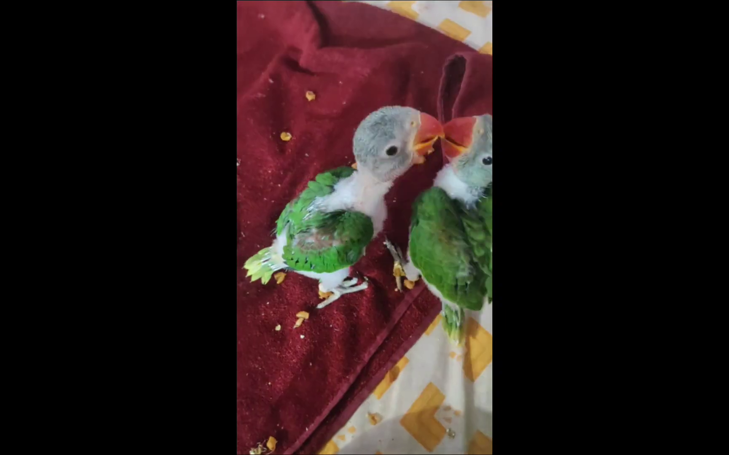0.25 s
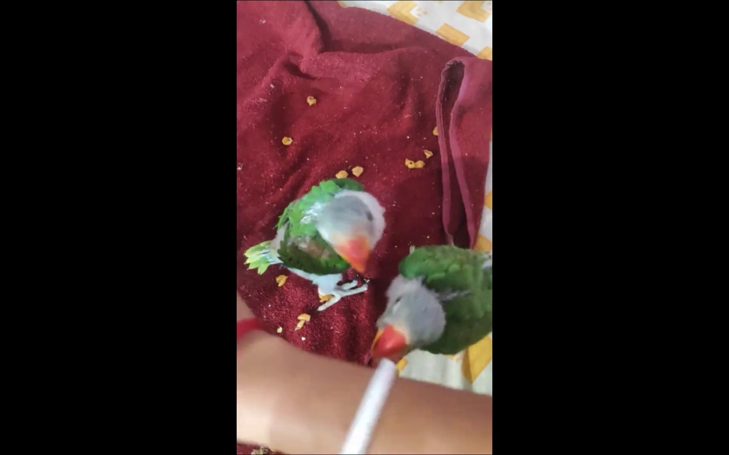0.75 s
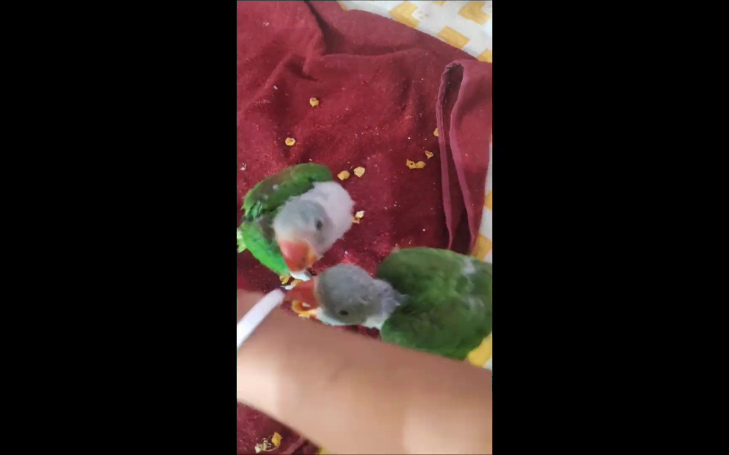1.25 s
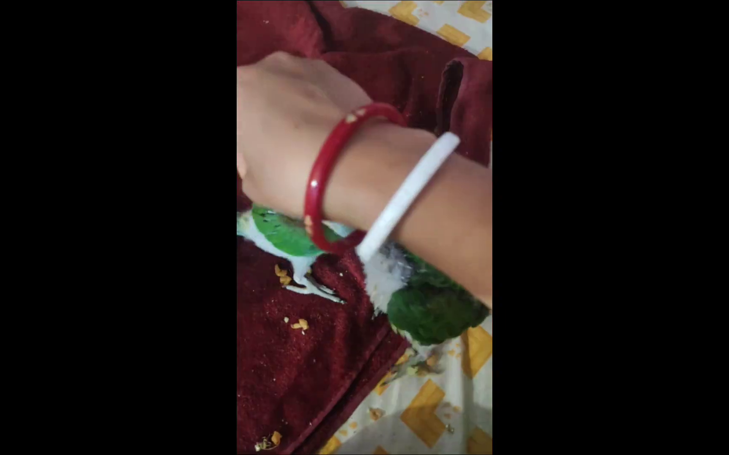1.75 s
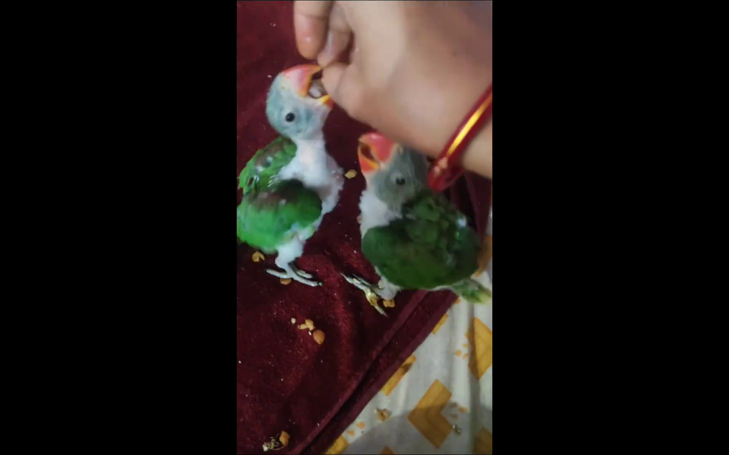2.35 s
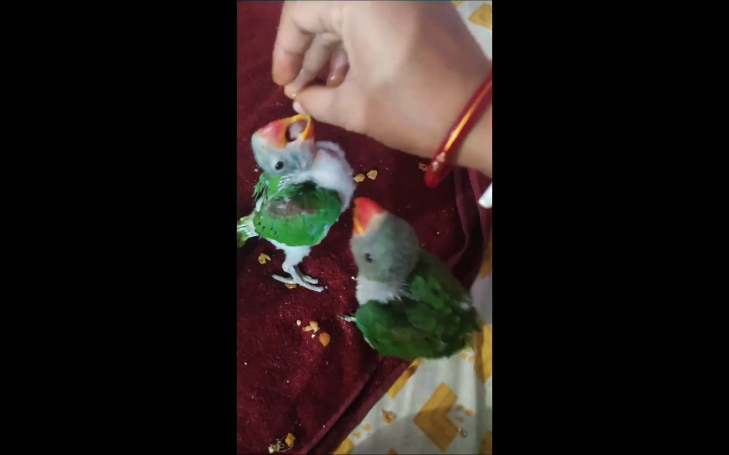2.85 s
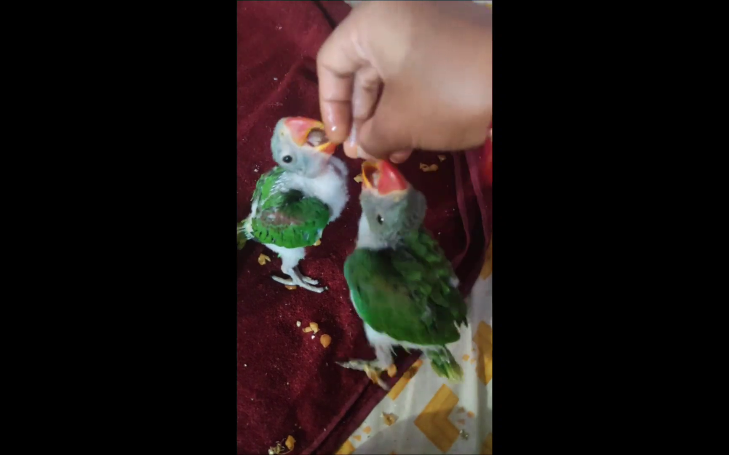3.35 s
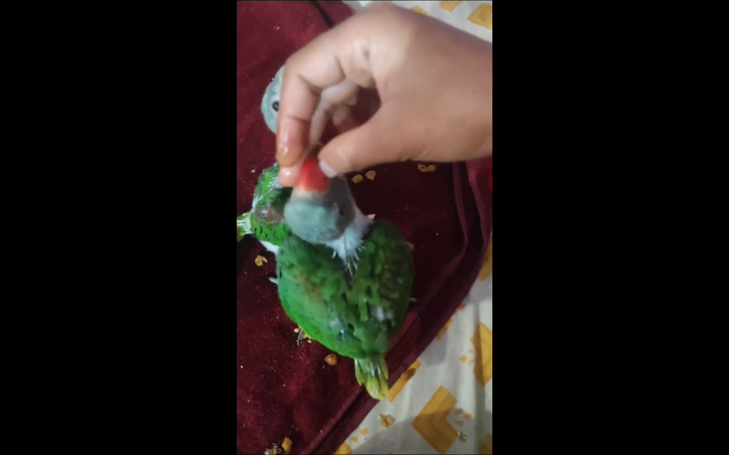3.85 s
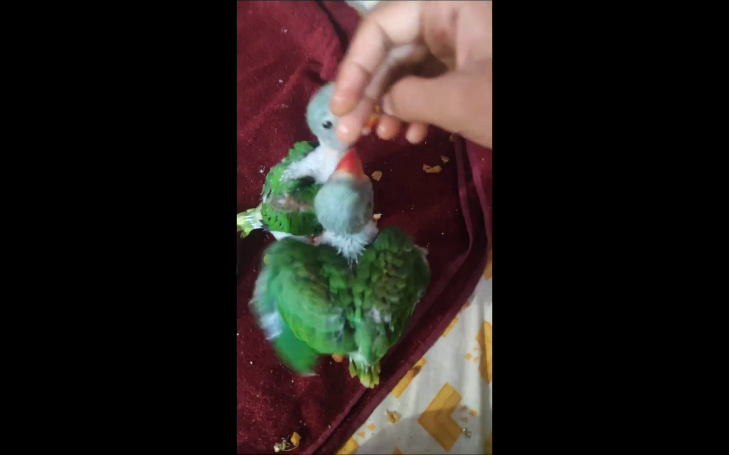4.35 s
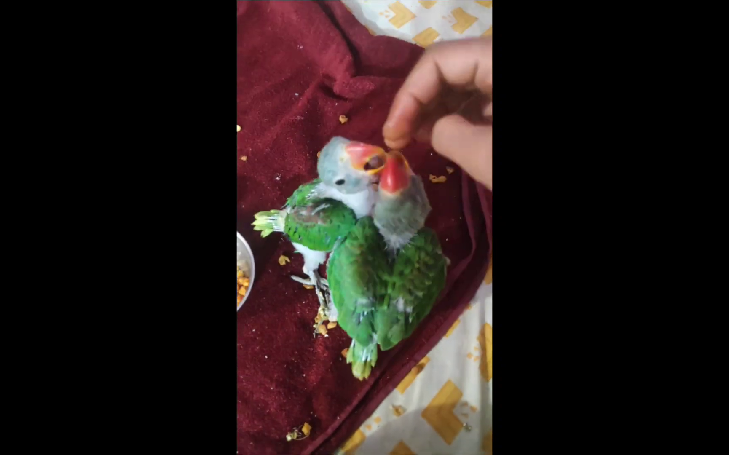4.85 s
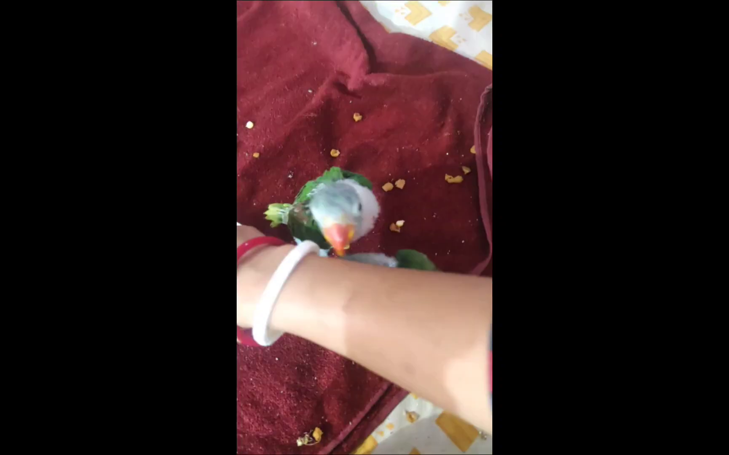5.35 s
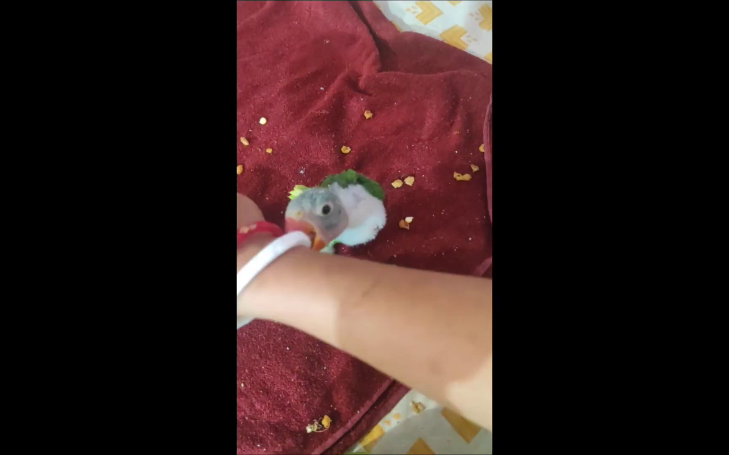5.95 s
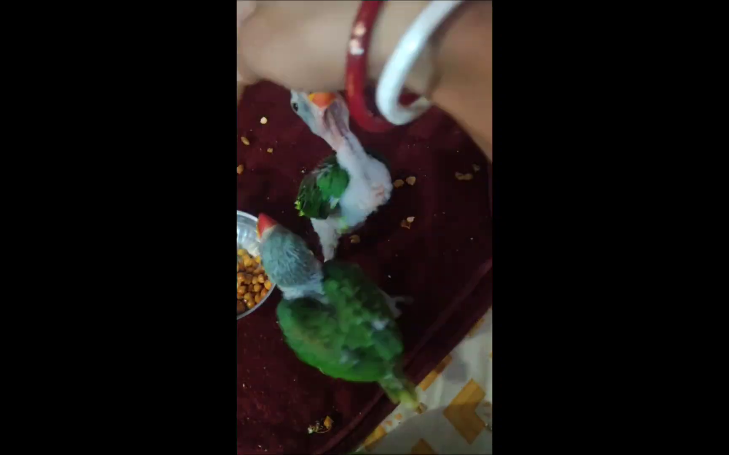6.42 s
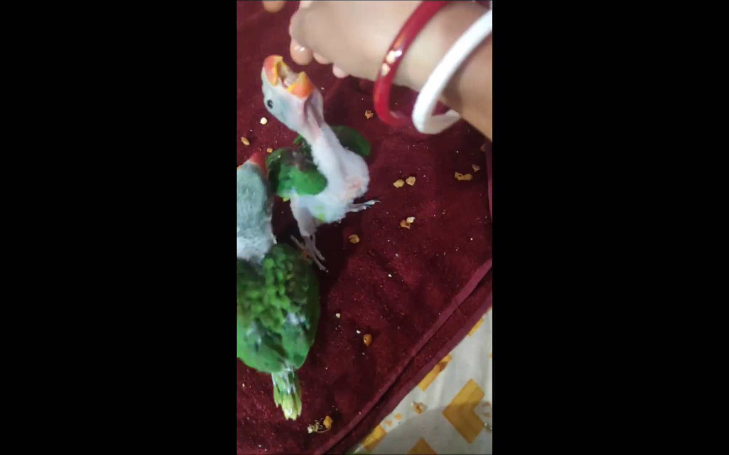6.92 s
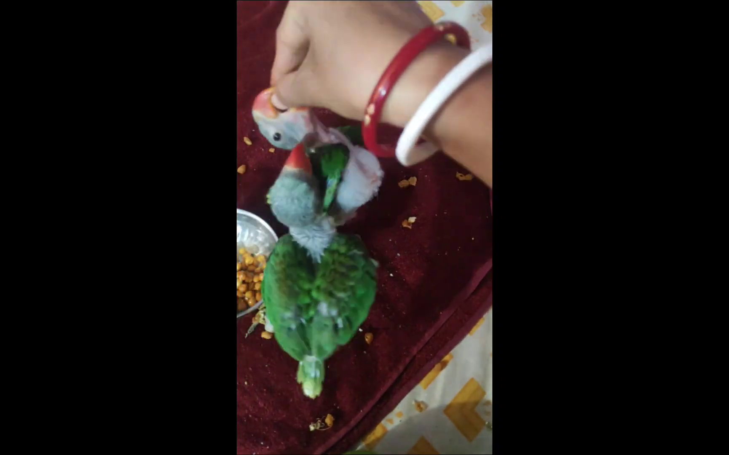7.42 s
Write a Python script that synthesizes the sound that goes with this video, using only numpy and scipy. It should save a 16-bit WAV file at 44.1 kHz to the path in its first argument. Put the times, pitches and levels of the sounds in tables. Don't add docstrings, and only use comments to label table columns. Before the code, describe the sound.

Close by, hungry parrot chicks squawk harshly at spaced intervals while a feeding hand clicks bangles and rustles a towel over low room rumble.

```python
import sys
import numpy as np
from scipy import signal
from scipy.fft import rfft, irfft, next_fast_len
from scipy.io import wavfile
from scipy.ndimage import uniform_filter1d

SR = 44100
rng = np.random.default_rng(int(sys.argv[2]) if len(sys.argv) > 2 else 0)


def transcribe(u):
    v = np.clip(np.atleast_2d(u).T, -1, 1)
    q = np.round(v * 32767).astype(np.int16)
    wavfile.write(sys.argv[1], SR, q)


def convert_level_to_amplitude(level_db):
    exponent = np.asarray(level_db, float) / 20
    return 10 ** exponent


N = 338688

# [f/Hz, level/dB]
RUMBLE_COLOUR = [(12, -30), (20, 4.5), (34, -4), (54, -10), (106, -8), (140, -17), (236, -11), (264, -14),
                 (320, -15.5), (412, -18.5), (476, -27.5), (654, -33.5), (900, -45.5), (1170, -67),
                 (1980, -120)]
# [f/Hz, level/dB]
HISS_COLOUR = [(1470, -36), (2500, -11.5), (2890, -10.5), (5450, -5.5), (6150, -1), (8740, 0), (10800, -28),
               (12600, -24.5), (15500, -33.5)]
# [f/Hz, level/dB]
RUB_COLOUR = [(250, -7.5), (500, 4.5), (1000, -3), (2000, -7), (4000, -13.5), (6000, -29.5)]
# [t/s, hiss level/dB, time to fade 10 dB/s, rubbing against hiss/dB]
MOVES = [(.63, -69, .2, -7.5), (.9, -78, .25, -13), (1.12, -83, 0.44, 5), (1.33, -68.5, 0.35, -18.5),
         (2.2, -78.5, .4, -3.5), (2.93, -71, 0.18, -7.5), (3.91, -76, .18, -5.5), (4.2, -79.5, 0.8, -7.5),
         (5.2, -70.5, 0.35, -12.5), (5.58, -72, 0.31, -5.5), (6.78, -73.5, 0.22, -4), (7.24, -76, 0.3, -18),
         (7.5, -83, 1, -7.5), (7.68, -70.5, 0.4, -17.5)]
# [t/s, pitch f/Hz, level/dB]
SQUAWKS = [
    [(0, 1133, -30.5), (.027, 1028, -33), (.035, 1110, -32.5), (.068, 1023, -31), (.09, 1003, -34.5),
     (.102, 802, -37), (.116, 954, -47.5), (.15, 910, -47), (.172, 701, -50)],
    [(1.43, 1033, -43.5), (1.446, 1332, -34.5), (1.464, 1359, -30), (1.498, 1298, -35.5),
     (1.516, 1194, -36), (1.566, 1210, -37), (1.58, 1035, -35.5), (1.63, 1004, -35)],
    [(2.414, 1077, -42), (2.426, 1143, -34), (2.444, 1278, -33.5), (2.46, 1283, -31.5),
     (2.482, 1147, -31.5), (2.506, 1121, -32), (2.53, 1011, -31), (2.623, 952.5, -31.5),
     (2.668, 895, -33.5)],
    [(4.798, 1178, -36), (4.815, 1200, -28), (4.834, 1214, -30.5), (4.862, 1083, -34), (4.9, 1066, -33),
     (4.99, 965, -34.5), (5.037, 892, -36.5)],
    [(6.42, 1090, -39.5), (6.435, 1180, -33), (6.455, 1205, -28.5), (6.485, 1179, -32.5), (6.52, 1083, -36),
     (6.6, 1006, -35), (6.647, 950.4, -34.5)],
]
# [first tremor jerk t/s, tremor depth f/Hz, left-right level/dB, even partials level/dB]
MANNERS = [(.2, 10, -1, -6.5), (1.7, 9.3, -2.5, -1.5), (2.53, 45, -4, -2.6), (4.866, 75, -3.5, -4.5),
           (6.537, 54, -2, -1.5)]
# [from t/s, to t/s, chaos/0-1, strong-weak pulsing/0-1]
CRACKS = [(0, .07, .17, .22), (.027, .03, .45, .5), (.08, .19, .45, .6), (1.51, 1.56, .42, .8),
          (1.57, 1.63, .52, .7), (4.965, 4.985, .2, .3), (4.93, 5.04, .12, .1), (6.51, 6.58, .12, .05),
          (6.585, 6.6, .32, .5), (6.61, 6.65, .42, .5)]
# [f/Hz, level/dB]
THROAT_COLOUR = [(292, -32.5), (600, -14.5), (1700, -11.5), (4900, -16.5), (6300, -14.5), (9600, -18),
                 (10350, -42), (14500, -39.5)]
# [f/Hz, half width f/Hz]
RESONANCES = [(1100, 250), (2100, 760), (3300, 750), (5400, 350), (7250, 520), (9000, 440)]
BEAK_AIMS = [(7.5, 1.5, 4.1, 3.6, 4.6, -1.5), (1.5, 6.3, 0.87, 3, 19, -2.5),
             (10.5, 3.5, 7.1, 10.5, 16, 0.5), (7.5, 3.5, 8.6, 10, 11.8, 6), (9.5, 7.6, 11, 8.2, 18.2, 16.5)]
# [t/s, peak level/dB, f/Hz]
GULPS = [(.098, -43, 400), (1.418, -56, 727), (1.63, -39.5, 820), (2.402, -52, 623), (2.672, -51, 395),
         (4.785, -53.5, 591), (6.412, -52.5, 607), (6.652, -48.5, 396)]
# [t/s, peak level/dB, f/Hz]
TAPS = [(0.567, -56.5, 890), (0.684, -57, 980), (0.719, -59.5, 1230), (0.883, -59.5, 1440),
        (1.083, -57, 740), (1.129, -60, 1090), (2.929, -57, 778), (3.654, -71, 910), (3.918, -65.5, 1660),
        (4.029, -63.5, 1275), (4.484, -63, 1040), (4.581, -62.5, 955), (5.548, -60, 1690),
        (5.605, -52.5, 1640), (5.619, -59, 700), (5.675, -60, 1100), (5.733, -57, 1450), (7.19, -67, 880),
        (0.513, -67, 760), (7.559, -61, 1510), (7.585, -73, 958)]
# [t/s, peak level/dB, left-right level/dB, time to fall 60 dB/s]
CLICKS = [(.515, -70, 2, .06), (.6844, -63.5, 18, 0.06), (1.309, -53, 9, .06), (1.3529, -19.5, 5.5, 0.013),
          (1.966, -50.5, 11, .032), (2.2666, -65.5, 1.5, .053), (4.1164, -55.5, 4.5, 0.062),
          (4.2214, -59.5, 16, .069), (4.482, -66, -6, .06), (4.5793, -66, -17, .054),
          (5.368, -26.5, 10.5, 0.06), (5.3764, -60, 0.5, .06), (5.4796, -35, 5.5, 0.16),
          (5.823, -54, -3, .06), (7.19, -54, 3, .085), (7.3078, -61.5, 23.5, .045),
          (7.5581, -50, 5.5, .066), (7.6529, -55.5, 15, .06)]
# [t/s, peak level/dB, left-right level/dB, time to fall 60 dB/s]
SCRATCHES = [(3.3681, -48.5, 8.5, 0.089), (6.0584, -42, -1.5, 0.14), (6.8245, -35, 5.5, 0.073),
             (7.1209, -37.5, 12.5, 0.087), (7.5763, -43.5, 7.5, 0.058)]
# [t/s, peak level/dB, left-right level/dB, time to fall 60 dB/s]
SCUFFS = [(1.0836, -42, 9.5, 0.11), (1.1011, -43.5, 10, .15), (1.1387, -51, 7, 0.12),
          (1.2245, -57, 22, 0.086), (1.2614, -48, 5, 0.043), (2.099, -49.5, 5.5, 0.13),
          (2.1274, -55, 2.5, 0.14), (2.9147, -46, 4, 0.16), (2.9408, -54, 1, 0.13),
          (2.969, -55.5, -.6, .12), (3.9674, -54.5, 3, .24), (4.039, -56.5, 2.5, 0.082),
          (5.203, -49, 16.5, 0.05), (6.0693, -53.5, -3, 0.15), (6.3324, -53, 12, 0.089),
          (6.8532, -41.5, 6, 0.059), (6.8691, -58, 1.5, .058), (7.221, -50.5, 8, .1),
          (7.4608, -53, 8.5, 0.067)]
# [t/s, peak level/dB]
THUDS = [(0.516, -60), (1.0833, -68), (1.1028, -60), (1.1393, -60.5), (1.2624, -57.5), (1.352, -47),
         (1.965, -70.5), (2.1, -65), (2.1262, -59), (2.266, -64.5), (2.9128, -69), (2.9396, -63),
         (2.969, -68), (3.3676, -66.5), (3.9672, -65), (4.039, -68), (5.48, -72), (5.8812, -70),
         (6.0582, -67), (6.8242, -75), (6.8691, -68), (7.19, -65.5), (7.4624, -62.5)]
# [f/Hz, level/dB]
SNAP_COLOUR = [(590, -52), (1000, -26), (2080, -14), (3370, -17), (5400, -13), (6340, -2), (7880, -3),
               (9150, 2.5), (12200, -29.5), (14300, -21.5), (15500, -35.5)]
# [f/Hz, level/dB]
SCUFF_COLOUR = [(590, -42), (1000, -17.5), (2500, -16), (3780, -12.5), (4100, -12), (8640, 5.5),
                (14000, -41.5), (15500, -38)]
# [f/Hz, time to fall 60 dB/s]
ROOM_T60 = [(300, 1), (1000, 0.28), (4000, 0.36), (10000, 0.17)]
# [f/Hz, level/dB]
LEFT_PORT = [(60, 3.5), (350, 5), (800, 5), (2400, 3.5), (4400, 2), (7000, -1.5), (8800, 5.5), (10500, 8.5)]
# [f/Hz, level/dB]
RIGHT_PORT = [(60, -3.5), (350, -9.5), (800, -3), (2400, -2.5), (4400, 1), (7100, 3), (8800, -6.5),
              (10500, 2.5)]


def rms_one(x):
    return x / np.sqrt(np.mean(x ** 2) + 1e-20)


def in_time(rows):
    s, *columns = np.transpose(rows)
    return [np.interp(np.arange(N) / SR, s, c) for c in columns]


def at_hz(points, hz):
    table_hz, values = np.array(points).T
    return np.interp(np.log(np.maximum(hz, 1)), np.log(table_hz), values)


def colour(x, points, lag_s=0):
    length = x.shape[-1]
    size = 2 * next_fast_len(length // 2 + 4096)
    hz = np.arange(size // 2 + 1) * SR / size
    cepstrum = irfft(np.log(convert_level_to_amplitude(at_hz(points, hz))), size)
    cepstrum[1:size // 2] *= 2
    cepstrum[size // 2 + 1:] = 0
    response = np.exp(rfft(cepstrum) - 2j * np.pi * hz * lag_s)
    return irfft(rfft(x, size) * response, size)[..., :length]


def drift(rate_hz):
    r = np.exp(-2 * np.pi * rate_hz / SR)
    noise = rng.standard_normal(N + SR)
    return rms_one(signal.lfilter([1], [1, -2 * r, r * r], noise)[SR:])


def panned(x, db):
    return x * convert_level_to_amplitude(db / 2 * np.array([[1], [-1]]))


def rumble():
    alike = .7
    mid, side = rng.standard_normal((2, N))
    pair = np.sqrt(1 + alike) * mid + np.sqrt(1 - alike) * side * [[1], [-1]]
    level_db = -65.5 + 0.92 * drift(2.6) + 1.6 * drift(53)
    return convert_level_to_amplitude(level_db) * rms_one(colour(pair, RUMBLE_COLOUR))


def rustle():
    still_hiss_db, still_rub_db = -84, -83.5
    grains_per_s = 900
    t = np.arange(N) / SR
    swells = np.array([convert_level_to_amplitude(db - 10 * np.abs(t - s) / fade_s) for s, db, fade_s, _ in MOVES]) ** 2
    hiss = np.sqrt(convert_level_to_amplitude(still_hiss_db) ** 2 + swells.sum(axis=0))
    rub_share = convert_level_to_amplitude(np.array(MOVES)[:, -1]) ** 2
    rub = np.sqrt(convert_level_to_amplitude(still_rub_db) ** 2 + rub_share @ swells)
    sizes = convert_level_to_amplitude(4.5 * np.minimum(rng.exponential(1, (2, N)), 3.5))
    slips = rng.random((2, N)) < grains_per_s * convert_level_to_amplitude(5 * drift(9)) / SR
    fibres = rng.standard_normal((2, N)) * (1 + 1.5 * sizes * slips)
    hiss = hiss * convert_level_to_amplitude(1.5 + 1.8 * drift(14)) * rms_one(colour(fibres, HISS_COLOUR))
    cloth = rms_one(colour(rng.standard_normal((2, N)), RUB_COLOUR))
    return hiss + rub * convert_level_to_amplitude(5.0 + 1.2 * drift(25)) * cloth


def membranes():
    clear, edge_chaos, edge_paired = .04, .5, .7
    settle_s = .016
    t, chaos, paired = np.arange(N) / SR, np.full(N, clear), np.zeros(N)
    starts = [rows[0][0] for rows in SQUAWKS[1:]]
    ends = [rows[-1][0] for rows in SQUAWKS]
    edges = [(s - .03, s - .004) for s in starts] + [(s + .01, s + .05) for s in ends]
    rough_spells = [(*edge, edge_chaos, edge_paired) for edge in edges] + list(CRACKS)
    for start, end, crack, pairing in rough_spells:
        on = np.clip(np.minimum(t - start, end - t) / settle_s + 1, 0, 1)
        chaos = np.maximum(chaos, crack * on)
        paired = np.maximum(paired, pairing * on)
    return chaos, paired


def tremor(t, first_s):
    rate_hz, jerk_share = 26.84, .28
    turns = (t - first_s) * rate_hz
    saw = np.interp(turns % 1, [0, jerk_share, 1], [0, 1, 0]) - .5
    return saw * (turns > (jerk_share - 1) / 2)


def squawks():
    slack_hz, onset_s, onset_db = 768, .014, -10
    slacken_s, release_s, release_db = .012, .042, -23
    bright_follows = .62
    sway_db, thin_db = 3.5, -11.5
    inertia_s = .0058
    chaos, paired = membranes()
    wobble = .002 * drift(60) + .0025 * drift(200) + .22 * chaos ** 1.5 * drift(350)
    flutter = np.array([drift(47) for _ in range(3)])
    air = rng.standard_normal(N)
    sway = np.array([drift(8.1) for _ in range(3)])
    high_pass = signal.butter(4, 5500, "high", fs=SR, output="sos")
    hiss = signal.sosfilt(high_pass, rng.standard_normal(N))
    out = np.zeros((2, N))
    bands = np.geomspace(200, 16000, 240)
    for rows, (jerk_s, depth_hz, pan_db, even_db), aim_db in zip(SQUAWKS, MANNERS, BEAK_AIMS):
        (start, _, first_db), (end, _, last_db) = rows[0], rows[-1]
        opening = [(start - onset_s - .004, slack_hz, -95), (start - onset_s, slack_hz, first_db + onset_db)]
        closing = [(end + slacken_s, slack_hz, last_db + release_db * slacken_s / release_s),
                   (end + release_s, slack_hz, last_db + release_db),
                   (end + release_s + .007, slack_hz, -95)]
        now = slice(round(max(opening[0][0], 0) * SR), round((closing[-1][0] + .003) * SR))
        hz, level_db = [c[now] for c in in_time(opening + list(rows) + closing)]
        hz = hz + depth_hz * tremor(np.arange(N)[now] / SR, jerk_s)
        hz = uniform_filter1d(hz, size=round(inertia_s * SR))
        bright_db = bright_follows * np.maximum(level_db - level_db.max(), -30)
        turn = 2 * np.pi * np.cumsum(hz * (1 + wobble[now])) / SR
        rough = chaos[now]

        voice = 0
        for k in range(1, 16):
            partial_db = (2.0 + 6.6 * rough) * flutter[k % 3, now] + bright_db * np.log2(k) / 2
            if k % 2 == 0:
                partial_db = partial_db + even_db
            if k == 1:
                partial_db = partial_db + thin_db * rough - 2.5
            strength = panned(convert_level_to_amplitude(partial_db), sway_db * sway[k % 3, now])
            voice = voice + strength * np.cos(k * turn + rng.uniform(0, 2 * np.pi))
        voice = voice * (1 + paired[now] * np.cos(turn / 2 + 2 * rough * flutter[0, now]))
        breath = 2.2 * rough ** 1.5 * air[now] + .6 * hiss[now]
        breath = breath * (1 + .7 * np.cos(turn)) * convert_level_to_amplitude(bright_db)

        tract_db = at_hz(THROAT_COLOUR, bands)
        for (f, half_width), db in zip(RESONANCES, aim_db):
            tract_db = tract_db + db / (1 + ((bands - f) / half_width) ** 2)
        voice = colour(voice + breath, np.transpose([bands, tract_db]))
        voice = voice / np.sqrt(uniform_filter1d(np.mean(voice ** 2, axis=0), size=1300) + 1e-9)
        out[:, now] = panned(voice * convert_level_to_amplitude(level_db), pan_db)
    return out


def gulps():
    out, t = np.zeros(N + SR), np.arange(round(0.013 * SR)) / SR
    for s, db, hz in GULPS:
        out[round(s * SR):][:len(t)] += convert_level_to_amplitude(db) * np.hanning(len(t)) * np.sin(2 * np.pi * hz * t)
    return out[:N]


def taps():
    out, t = np.zeros(N + SR), np.arange(SR // 10) / SR
    for s, db, hz in TAPS:
        r, w = np.exp(-np.pi * .3 * hz / SR), 2 * np.pi * hz / SR
        puff = convert_level_to_amplitude(-60 * t / 0.089) * rng.standard_normal(len(t))
        ring = signal.lfilter([1, 0, -1], [1, -2 * r * np.cos(w), r * r], puff)
        out[round(s * SR):][:len(t)] += convert_level_to_amplitude(db - 2.0) * ring / np.abs(ring).max()
    return panned(out[:N], 3.0)


def clicks():
    snaps, scuffs, thuds = np.zeros((2, N + SR)), np.zeros((2, N + SR)), np.zeros(N + SR)
    t = np.arange(SR // 5) / SR
    low_band = signal.butter(2, [150, 600], "band", fs=SR, output="sos")
    low = rms_one(signal.sosfilt(low_band, rng.standard_normal(N + SR)))
    for rows, sharp in [(CLICKS, .78), (SCRATCHES, .5), (SCUFFS, .07)]:
        for s, db, pan_db, t60 in rows:
            now = slice(round(s * SR), round(s * SR) + len(t))
            noise = panned(convert_level_to_amplitude(db) * rng.standard_normal(len(t)), pan_db - 8)
            snap_shape = np.minimum(t / 0.0012, 1) * convert_level_to_amplitude(-60 * t / 0.0091)
            scuff_shape = np.minimum(t / (0.11 * t60), 1) * convert_level_to_amplitude(-60 * t / t60)
            snaps[:, now] += sharp * snap_shape * noise
            scuffs[:, now] += (1 - sharp) * scuff_shape * noise
    for s, db in THUDS:
        now = slice(round(s * SR), round(s * SR) + len(t))
        thuds[now] += convert_level_to_amplitude(db + 1.5) * np.minimum(t / 0.00073, 1) * convert_level_to_amplitude(-60 * t / 0.071) * low[now]
    white = rng.standard_normal(SR)
    snaps = colour(snaps[:, :N], SNAP_COLOUR) / np.std(colour(white, SNAP_COLOUR))
    scuffs = colour(scuffs[:, :N], SCUFF_COLOUR) / np.std(colour(white, SCUFF_COLOUR))
    return convert_level_to_amplitude(2) * snaps + convert_level_to_amplitude(-7.5) * scuffs + thuds[:N]


def room(x):
    tail_db, echo_db = -12, -6.5
    t = np.arange(SR // 2) / SR
    tail = 0
    for hz in 250 * 2. ** np.arange(6):
        band = signal.butter(2, [hz / np.sqrt(2), hz * np.sqrt(2)], "band", fs=SR, output="sos")
        noise = signal.sosfilt(band, rng.standard_normal((2, len(t))))
        tail = tail + noise * convert_level_to_amplitude(-60 * t / at_hz(ROOM_T60, hz))
    gate = np.clip((.14 - t) / 0.086, .06, 1)
    tail = tail * np.clip(t / 0.002, 0, 1) * gate
    tail *= convert_level_to_amplitude(tail_db) / np.sqrt(np.sum(tail ** 2, axis=1, keepdims=True))
    for side in tail:
        lags = rng.uniform(.0007, .014, 12)
        side[(lags * SR).astype(int)] += convert_level_to_amplitude(echo_db - 900 * lags) * rng.choice([-1, 1], 12)
    return x + signal.fftconvolve(x, tail, axes=1)[:, :N]


def scene():
    return room(squawks() + gulps() + taps() + clicks()) + rustle() + rumble()


def band_limit(x):
    return signal.sosfilt(signal.butter(12, 15900, fs=SR, output="sos"), x)


def record(dry):
    left = colour(dry[0], LEFT_PORT, lag_s=0.0002627)
    right = colour(dry[1], RIGHT_PORT)
    top_cut = signal.cheby2(12, 60, 15700, fs=SR, output="sos")
    pair = signal.sosfilt(top_cut, np.array([left, right]))
    return band_limit(pair)


dry = scene()
out = record(dry)
transcribe(out)
```